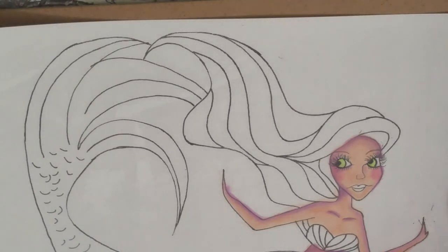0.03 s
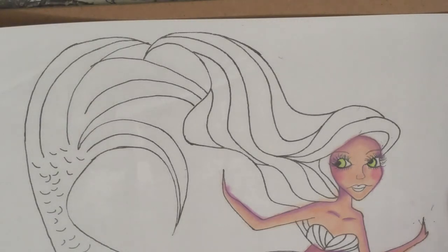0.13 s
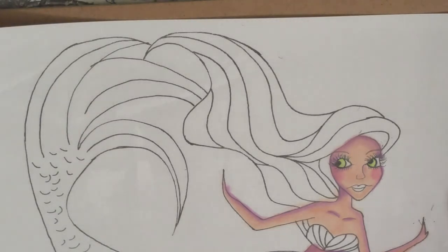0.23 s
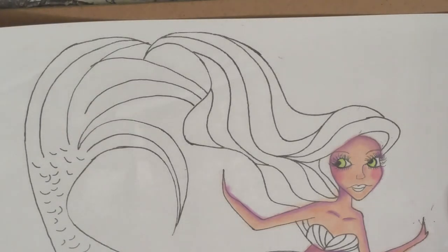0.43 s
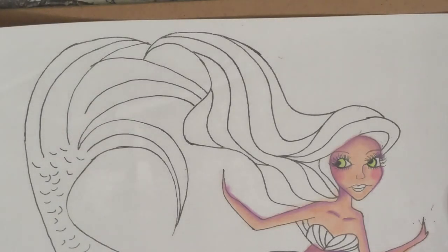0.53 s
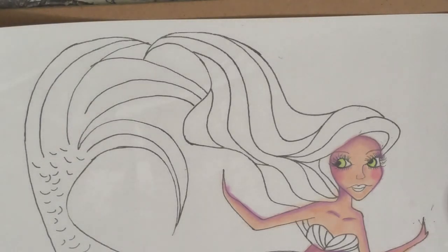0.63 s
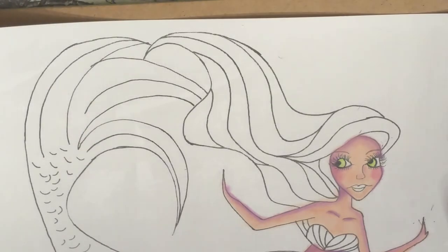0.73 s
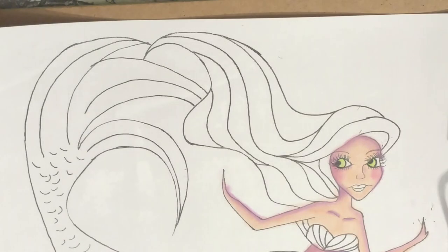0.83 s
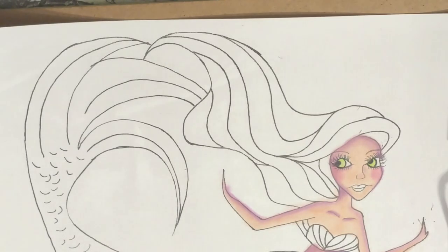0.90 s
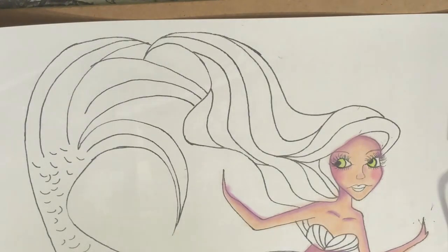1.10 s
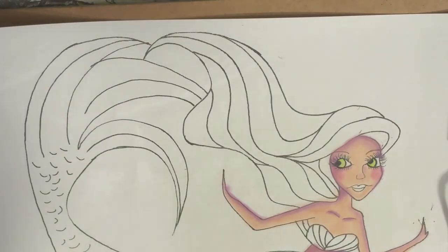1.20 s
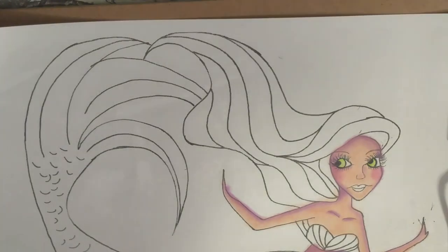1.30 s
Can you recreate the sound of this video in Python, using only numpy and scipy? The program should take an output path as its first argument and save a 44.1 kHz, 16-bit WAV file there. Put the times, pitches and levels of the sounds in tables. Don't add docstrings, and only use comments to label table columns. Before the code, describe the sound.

Three quick, light clinks of a brush's metal ferrule on a glass jar in a quiet room

```python
import sys
import numpy as np
from scipy import signal
from scipy.fft import rfft, irfft
from scipy.io import wavfile

SR = 44100
rng = np.random.default_rng(int(sys.argv[2]) if len(sys.argv) > 2 else 0)


def materialize(psi):
    bounded = np.clip(np.atleast_2d(psi).T, -1, 1)
    quanta = np.round(bounded * 32767).astype(np.int16)
    wavfile.write(sys.argv[1], SR, quanta)


def attenuation_scalar(level_db):
    decades = np.asarray(level_db, float) / 20
    return 10 ** decades


N = 59535
TIME_S = np.arange(N) / SR
RIGHT_LAG_S = .000278


def curve(table, hz):
    table = np.array(table, float)
    return np.interp(np.log(hz + 1), np.log(table[:, 0]), table[:, 1])


def colour(x, gain):
    return irfft(rfft(x) * gain(np.arange(N // 2 + 1) * SR / N), N)


def band(hz, width_hz):
    x = colour(rng.standard_normal((2, N)), lambda f: 1 / (1 + ((f - hz) / width_hz * 2) ** 4))
    return x / x.std()


def ages(time_s, start_s, lag_s):
    return np.maximum(time_s - start_s - np.array([[0], [lag_s]]), 0)


def decay(age, t60_s, rise_s):
    return (1 - np.exp(-age / rise_s)) * 1000. ** (-age / t60_s)


def fade(start_s, t60_s, rise_s=0.0001):
    return decay(ages(TIME_S, start_s, RIGHT_LAG_S), t60_s, rise_s)


def ring(start_s, hz, t60_s, pan_db, lag_us=RIGHT_LAG_S * 10 ** 6, rise_s=.0005):
    out = np.zeros((2, N))
    first = int(start_s * SR)
    age = ages(np.arange(first, N) / SR, start_s, lag_us / 10 ** 6)[:, :int(2 * t60_s * SR)]
    tone = np.sin(2 * np.pi * hz * age) * decay(age, t60_s, rise_s)
    out[:, first:first + age.shape[1]] = tone * attenuation_scalar([[pan_db / 2], [-pan_db / 2]])
    return out


def room(x, db):
    t60_s, gap_s = 0.11, 0.006
    age = np.arange(int(SR / 3)) / SR
    tail = rng.standard_normal((2, len(age))) * 1000. ** (-age / t60_s) * (age > gap_s)
    tail = tail / np.sqrt((tail ** 2).sum(axis=1, keepdims=True))
    return attenuation_scalar(db) * signal.fftconvolve(x, tail, axes=1)[:, :N]


# f/Hz, level/dB per Hz
AIR_SPECTRUM = [(25, -16.5), (55, -13), (100, -5.5), (250, -22.5), (400, -22), (800, -27), (3500, -35),
                (15500, -41.5)]
# f/Hz, left-right correlation
AIR_LIKENESS = [(60, .87), (130, 0.27), (290, 0.48), (640, .2), (1400, 0.012), (15000, .01)]
# t/s, level/dB
RUMBLE_SWELL = [(0.0, -65.5), (0.424, -57), (0.48, -66), (0.774, -57.5), (0.804, -96), (1.206, -67),
                (1.35, -68.5)]


def air():
    level_db, hiss_top_hz = -66, 15750

    def spectrum(f):
        return attenuation_scalar(curve(AIR_SPECTRUM, f)) * (f < hiss_top_hz)

    def likeness(f):
        return np.clip(curve(AIR_LIKENESS, f), 0, 1)

    mid = colour(rng.standard_normal(N), lambda f: spectrum(f) * np.sqrt(1 + likeness(f)))
    side = colour(rng.standard_normal(N), lambda f: spectrum(f) * np.sqrt(1 - likeness(f)))
    hiss = np.array([mid + side, mid - side]) * attenuation_scalar(level_db) / mid.std()
    swell_db = np.interp(TIME_S, *np.array(RUMBLE_SWELL).T)
    rumble = attenuation_scalar(swell_db - 5) * band(105, 54.93)[0]
    shared, extra = band(360, 300)
    stir = attenuation_scalar(swell_db - 12.5) * np.array([shared + extra, shared])
    return hiss + rumble + stir


# t/s, contact/ms, ring level during contact/dB, thud level/dB
TAPS = [
    (.2282, 5.5, -9, -48),
    (.4978, 6.0, 2.5, -54),
    (.6358, 8.0, -3, -52),
]
WALL_HZ = [2328, 2359, 3778, 4644, 4683, 7785, 7817, 9364, 10023, 10140, 13407, 13628, 14362, 15350]
# t60/s, left-right level/dB, lag at the right microphone/us (each lobe radiates from its own side)
WALL = [(.42, 8, 231), (.43, 2, 302), (.18, 13, 294), (.22, -3, 281), (.185, 1, 262), (.19, 1, 292),
        (.15, 2, 299), (.13, -3, 344), (.11, -2, 321), (.11, 1, 271), (.1, -1, 282), (.09, 7, 278),
        (.1, 4, 278), (.09, 0, 280)]
# level at tap 1, 2, 3/dB
LOW_WALL_DB = [(-31.5, -34, -31.5), (-29, -23.5, -34), (-48, -29, -34), (-30, -25, -42), (-19, -12, -15.5),
               (-43, -27, -31), (-25, -27, -24)]
TAP_SIDES = [(-1, 1, -1), (1, 1, 1), (1, 1, 1), (1, -1, 1), (1, 1, 1), (1, 1, 1), (1, 1, 1)]
# level at tap 1, 2, 3/dB
HIGH_WALL_DB = [(-39.5, -33, -21.5), (-49, -32.5, -37.5), (-39, -27, -25.5), (-43, -53, -26),
                (-36, -49, -36.5), (-67, -51, -24), (-38, -30, -47.5)]
BASE_HZ = [2945, 3186, 4251, 5020, 5580, 5920, 6778, 9246, 9636, 9750, 10900, 11700, 12490, 15600]
# t60/s, left-right level/dB, polarity
BASE = [(.11, 5, 1), (.11, 9, 1), (.12, 3, 1), (.11, 2, 1), (.2, 2, 1), (.11, 0, 1), (.11, 12, 1),
        (.14, 2, -1), (.11, 1, -1), (.1, 0, 1), (.2, 0, 1), (.1, 0, 1), (.12, 0, 1), (.1, 0, 1)]
# level at tap 1, 2, 3/dB
BASE_DB = [(-52, -58, -60), (-47, -50, -53), (-44, -40, -43), (-47, -40, -53), (-62, -59, -48),
           (-60, -46, -70), (-43, -42, -44), (-70, -55, -37), (-58, -41, -34), (-36, -38, -40),
           (-85, -80, -60), (-60, -58, -54), (-62, -54, -49), (-50, -42, -46)]


def jar():
    settle_s, base_lag_us = .0015, 325
    out = attenuation_scalar(-61) * ring(0, WALL_HZ[0], *WALL[0])
    for k, (start, touch_ms, touch_db, _) in enumerate(TAPS):
        low = sum(side[k] * attenuation_scalar(dbs[k]) * ring(start, hz, *mode)
                  for hz, mode, dbs, side in zip(WALL_HZ, WALL, LOW_WALL_DB, TAP_SIDES))
        high = sum(attenuation_scalar(dbs[k]) * ring(start, hz, *mode)
                   for hz, mode, dbs in zip(WALL_HZ[7:], WALL[7:], HIGH_WALL_DB))
        base = sum(sign * attenuation_scalar(dbs[k]) * ring(start, hz, t60, pan_db, base_lag_us)
                   for hz, (t60, pan_db, sign), dbs in zip(BASE_HZ, BASE, BASE_DB))
        touching = np.clip((start + touch_ms / 1000 - TIME_S) / settle_s, 0, 1)
        stopped = np.clip((start + settle_s - TIME_S) / settle_s, 0, 1)
        out = out * stopped + low * attenuation_scalar(touch_db * touching) + high + base
    return out


# t/s, centre f/Hz, width/Hz, t60/s, level/dB
TICKS = [
    (0.0399, 6720, 1100, 0.019, -52.5),
    (0.09, 8800, 3000, 0.014, -57),
    (0.142, 12300, 5900, 0.021, -64),
    (.166, 7800, 78, 0.18, -78),
    (1.258, 12000, 8750, 0.17, -64),
    (1.28, 382, 393, 0.23, -60),
]


def ticks():
    return sum(attenuation_scalar(db) * band(hz, width) * fade(start, t60, t60 / 12) for start, hz, width, t60, db in TICKS)


# level/dB, brightest f/Hz, t60/s, share in the room/dB
CRACKS = [
    (-19, 6900, .01, -2),
    (-22, 12000, .01, -8),
    (-21, 10000, .025, -8),
]
# f/Hz, level/dB
CRACK_SPECTRUM = [(600, -38.5), (1500, -8), (3000, -7), (7000, -7.5), (11000, -20), (16000, -25)]


def crack(start, db, peak_hz, t60):
    def spectrum(f):
        peak_db = 9 * np.exp(-(np.log((f + 1) / peak_hz) / .15) ** 2)
        return attenuation_scalar(curve(CRACK_SPECTRUM, f) + peak_db)

    grit = colour(rng.standard_normal(N), spectrum)
    pair = np.array([grit, np.roll(grit, int(RIGHT_LAG_S * SR))]) / grit.std()
    return attenuation_scalar(db) * fade(start, t60) * pair * attenuation_scalar([[1.5], [-1.5]])


def thud(start, db):
    t60_s = 0.082
    modes = ring(start, 241, t60_s, 0, rise_s=.003) + .8 * ring(start, 399, t60_s, 0, rise_s=.003)
    knock = attenuation_scalar(-1.5) * band(720, 1000) * fade(start, 0.17, .004)
    return attenuation_scalar(db) * (modes + knock)


def brush():
    near, far = 0, 0
    for (start, _, _, thud_db), (db, peak_hz, t60, room_db) in zip(TAPS, CRACKS):
        burst = crack(start, db, peak_hz, t60)
        near = near + burst + thud(start, thud_db)
        far = far + attenuation_scalar(room_db) * burst
    return near, far


def scene():
    glass, (near, far) = jar(), brush()
    return glass + room(glass, -21) + near + room(far, -8) + ticks() + air()


def roll_off(x):
    return signal.sosfilt(signal.butter(12, 16900, fs=SR, output="sos"), x)


def record(dry):
    low_pass = signal.ellip(8, .3, 70, 15950, fs=SR, output="sos")
    mix = signal.sosfilt(low_pass, dry)
    return roll_off(mix)


dry = scene()
out = record(dry)
materialize(out)
```